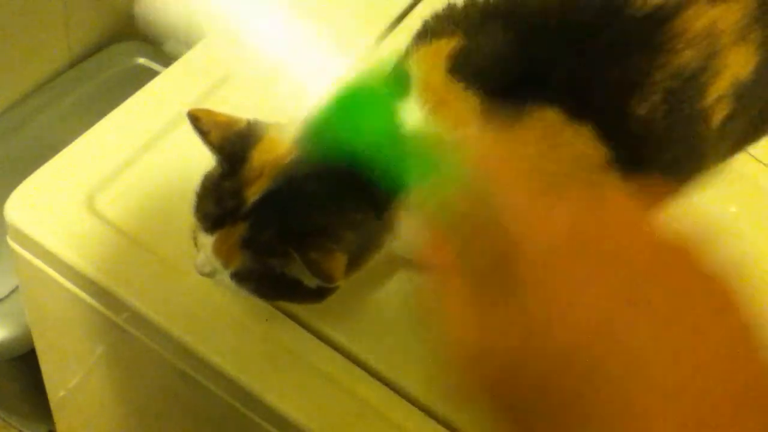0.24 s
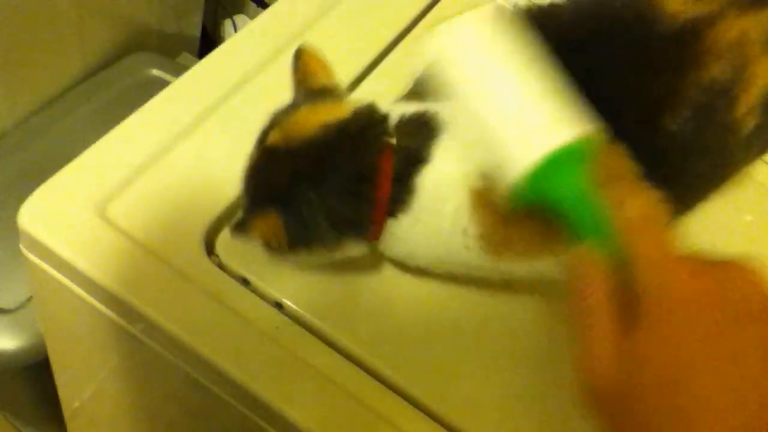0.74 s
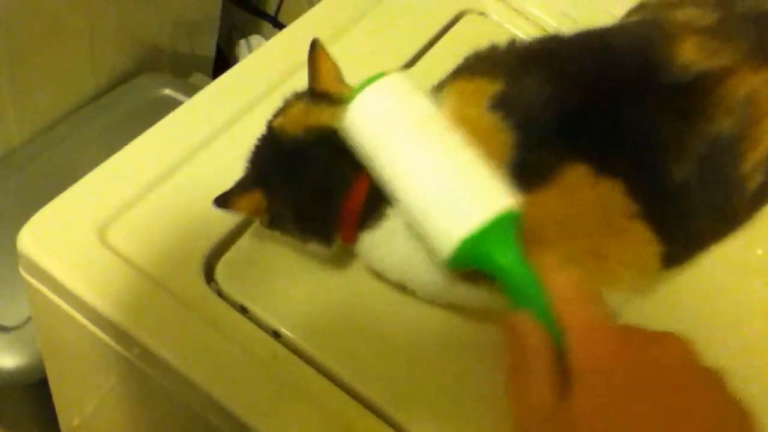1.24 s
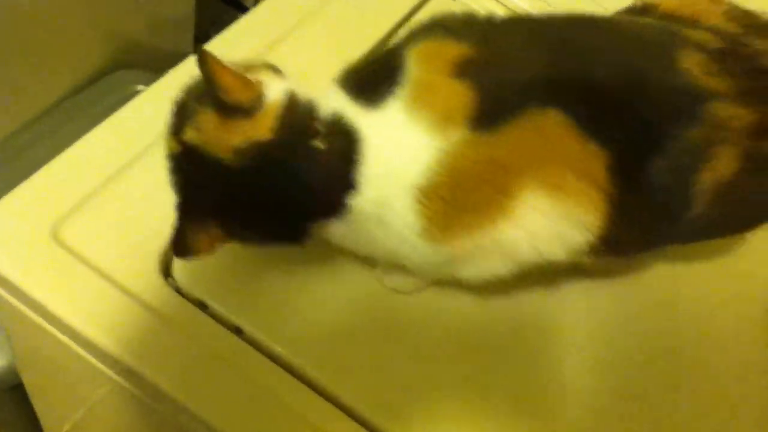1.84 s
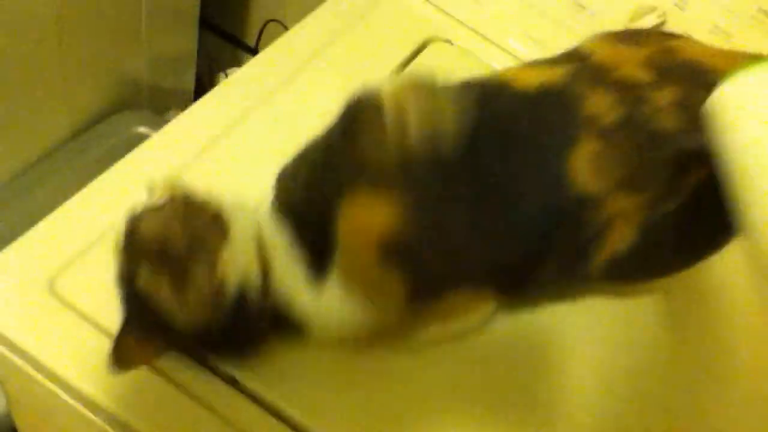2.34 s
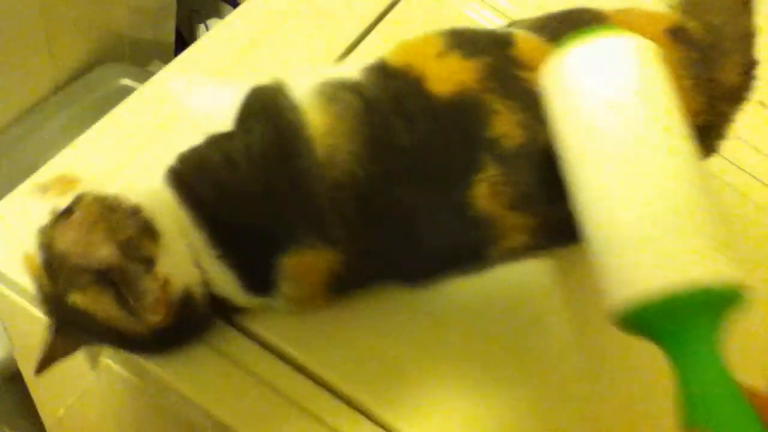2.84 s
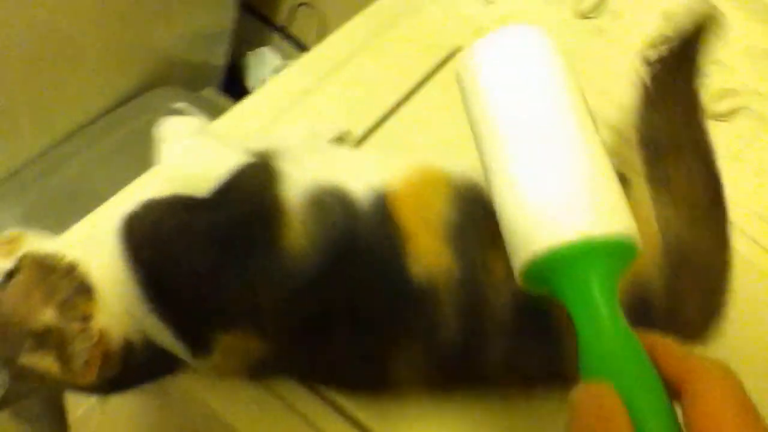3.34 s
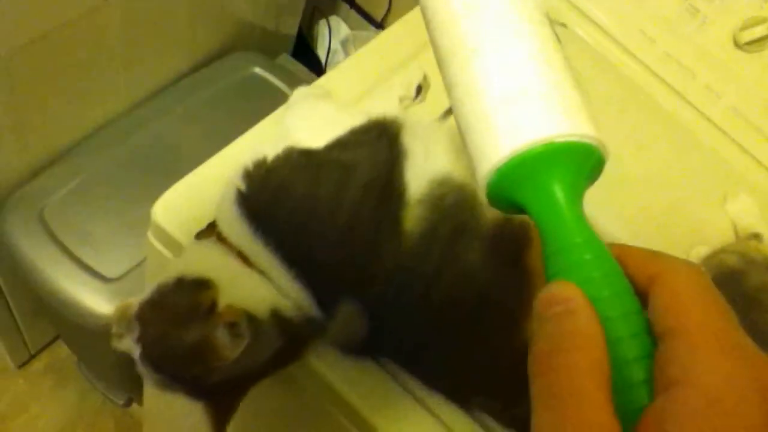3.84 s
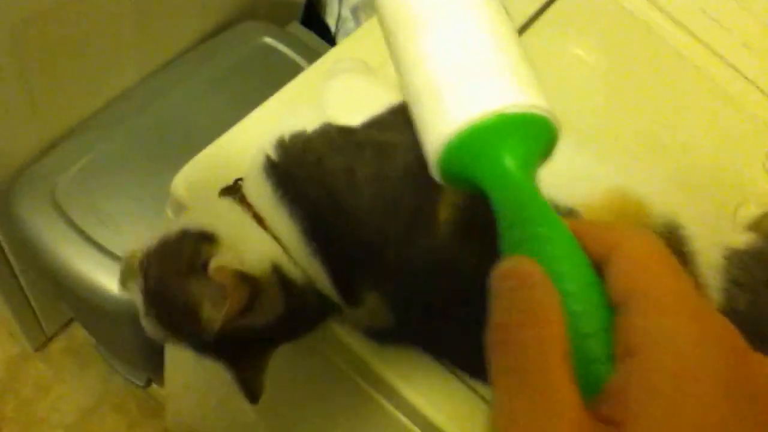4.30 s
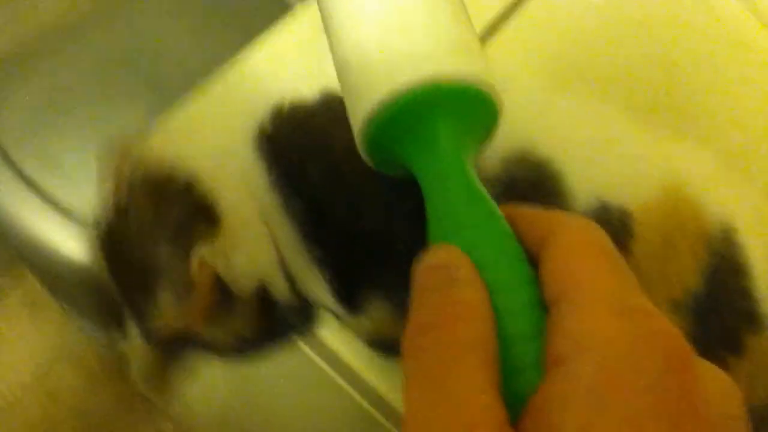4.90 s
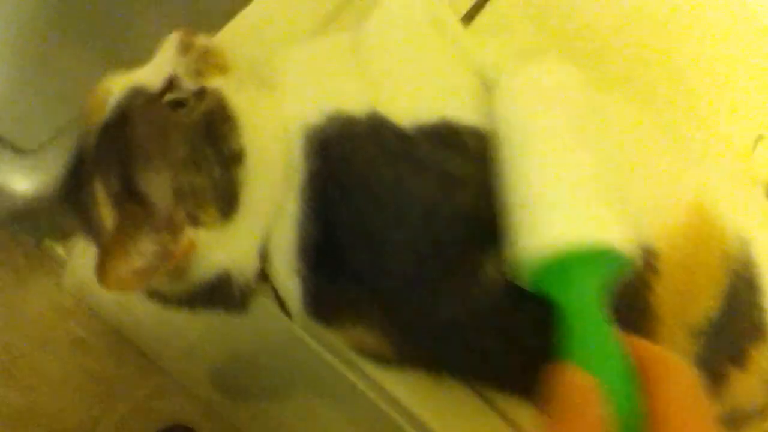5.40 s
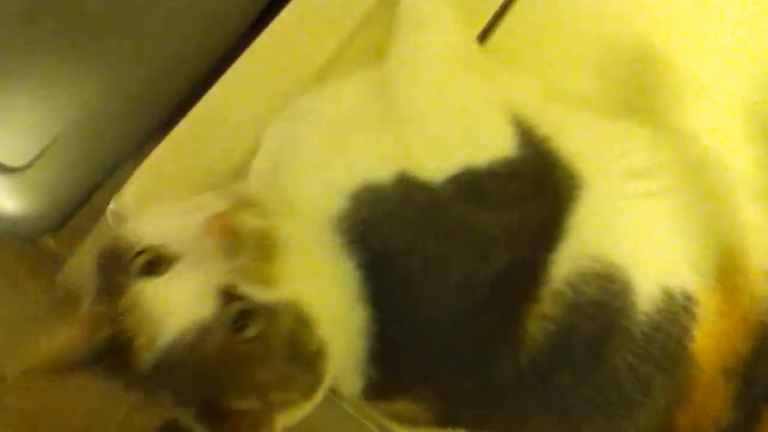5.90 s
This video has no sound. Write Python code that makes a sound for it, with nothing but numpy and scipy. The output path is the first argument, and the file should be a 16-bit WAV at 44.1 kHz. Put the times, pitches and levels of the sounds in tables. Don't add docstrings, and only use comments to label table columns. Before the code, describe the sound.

Close to the microphone, glue rips lightly from hair in short bright strokes, with hollow plastic knocks between them. A cat purrs in soft fluttering breaths. After the strokes stop, it shifts its weight on a metal appliance top, giving dull rumbles, a tag chink and dry scuffs. A calmer stretch of purr and small clacks leads to a last burst of sticky crackle, over low motor hum and faint ticking.

```python
import sys
import numpy as np
from scipy import signal
from scipy.fft import rfft, irfft, next_fast_len
from scipy.io import wavfile
from scipy.ndimage import map_coordinates

SR = 44100
rng = np.random.default_rng(int(sys.argv[2]) if len(sys.argv) > 2 else 0)


def to_wav(sig):
    pcm = np.clip(np.atleast_2d(sig), -1, 1) * 32767
    pcm = np.round(pcm).astype(np.int16)
    wavfile.write(sys.argv[1], SR, pcm.T)


def to_linear_factor(level_db):
    exponent = np.asarray(level_db, float) / 20
    return 10 ** exponent


N = 271215

# start t/s, crest t/s, end t/s, level/dB
BREATHS = [
    (.88, 1.01, 1.38, -52),
    (2.2, 2.26, 2.6, -52),
    (2.56, 2.77, 2.9, -50),
    (3.72, 3.95, 4.31, -52),
    (5.31, 5.345, 5.62, -50.5),
    (5.65, 5.71, 5.98, -55),
]
# first snap t/s, rate f/Hz, slide of phase [cycles/s2]
SNAP_RUNS = [
    (.892, 28.4, 0),
    (2.215, 29.3, -3),
    (2.607, 28.3, 0),
    (3.722, 29.2, -.5),
    (5.294, 28.55, 0),
]
# f/Hz, width f/Hz, level/dB
THROAT = [
    (129, 28, 6),
    (182, 112, 11),
    (306, 90, -11),
]


def purr():
    t = np.arange(N) / SR
    run = np.maximum(np.searchsorted(np.array(SNAP_RUNS)[:, 0], t) - 1, 0)
    first, rate, slide = np.transpose(SNAP_RUNS)[:, run]
    since = t - first
    turns = rate * since + slide * since ** 2 / 2 + 0.037 * wobble(25)
    snaps = (np.diff(np.floor(turns), prepend=0) > 0) * to_linear_factor(1.0 * wobble(40))
    puffs = rng.standard_normal(N) * np.exp(-3.5 * (turns % 1))

    def chest(f):
        high_pass = (1j * f / (95 + 1j * f)) ** 2
        low_pass = 1 / (1 + 1j * f / 520) ** 2
        return modes(THROAT)(f) * high_pass * low_pass

    voice = unit(filtered(snaps, chest)) + 0.45 * unit(filtered(puffs, chest))
    return swells(BREATHS, sharp=0.57) * unit(voice)


# start t/s, crest t/s, end t/s, peel level/dB, core level/dB
STROKES = [(0.03, 0.106, 0.19, -44.5, -52), (0.163, 0.2, 0.32, -44, -54), (0.702, 0.782, 0.86, -52.5, -46),
           (.83, 0.978, 1.146, -45, -52), (1.32, 1.348, 1.39, -72, -56), (1.458, 1.575, 2.17, -43.5, -51.5),
           (1.884, 2.008, 2.125, -44, -52), (1.975, 2.022, 2.026, -39, -52), (2.34, 2.403, 2.47, -61, -66),
           (2.637, 2.753, 2.87, -59, -62.5), (5.52, 5.715, 5.85, -53.5, -53),
           (5.723, 5.9, 6.01, -45.5, -52.5), (5.772, 5.858, 5.96, -44, -56)]
# t/s, firmness [0-1]
FIRMNESS = [(.15, 0), (.2, .45), (.8, .25), (1, .4), (1.5, .5), (1.6, 1), (2.1, 1), (5.7, 1)]
# f/Hz, density level/dB per Hz
PEEL = [(1500, -36), (2300, -15), (3100, -3.5), (4200, -1), (5300, -1.5), (7000, -2.5), (9000, -11.5),
        (12000, -54)]
# f/Hz, width f/Hz, level/dB
PAPER_ROLL = [
    [(2000, 150, -4), (2500, 300, 0), (3360, 250, -5), (4500, 200, -8)],
    [(1670, 120, -6), (2160, 100, -7), (3130, 200, 0), (5280, 300, -4)],
]
# f/Hz, density level/dB per Hz
CORE = [(450, -35), (750, -9), (1040, -6), (1110, 3), (1190, -7), (1900, -5), (2500, -4), (3300, -9),
        (4800, -30)]
# f/Hz, density level/dB per Hz
FIZZ = [(6000, -120), (7500, -6.5), (10000, 2), (12500, -3.5), (15500, -18)]


def roller():
    snaps = crackle(spread_db=2, clump_db=0.7)
    firm = np.clip(np.interp(np.arange(N) / SR, *np.transpose(FIRMNESS)), 0, 1)
    light, hard = (unit(filtered(crackle(spread_db=2, clump_db=3.5), modes(table))) for table in PAPER_ROLL)
    paper = np.sqrt(1 - firm) * light + np.sqrt(firm) * hard
    peel = unit(coloured(snaps, PEEL)) + 0.73 * paper
    core = unit(coloured(snaps, CORE))
    fizz = to_linear_factor(-12 + 3.5 * firm) * unit(coloured(snaps, FIZZ))
    pull = swells([(*row[:3], row[3]) for row in STROKES], sharp=1.27)
    roll = swells([(*row[:3], row[4]) for row in STROKES], sharp=1.27)
    near = pull * (unit(peel) + fizz) + roll * core
    return 0.94 * near + 0.31 * signal.fftconvolve(near, tail())[:N]


# t/s, peak level/dB, low-band level/dB, high-
# band level/dB, decay share [0-1]
CLACKS = [(0.578, -20.5, -23, -30, 0.74), (1.14, -12, -24, -20.5, .95), (1.334, -44, -10, -14, .56),
          (2.503, -10, -21, -13, 1), (2.965, -23.5, -24.5, -32.5, 0.67), (3.257, -20.5, -16.5, -21.5, 0.86),
          (3.382, -28.5, -12, -45, 0.66), (3.49, -37.5, 7, -28, 1), (4.156, -27.5, -18, -39, 0.76),
          (4.25, -28, -18, -24, 0.65), (5.431, -30.5, -14, -34, .64), (5.597, -28, -13, -26, 0.55)]
# f/Hz, density level/dB per Hz
CLACK_COLOUR = [(150, -34), (300, -21.5), (450, -10.5), (1000, -6.5), (2000, -4), (3300, -3.5), (5200, 0),
                (8000, -5), (11500, -4.5), (15800, -15), (17000, -64)]


def clacks():
    out = np.zeros(N + SR)
    t = np.arange(SR // 2) / SR
    hz = np.fft.rfftfreq(2048, 1 / SR)
    for s, db, low_db, high_db, share in CLACKS:
        tilt = [(1100, low_db + 18.5), (2200, 0), (4200, 0.0099),
                (9000, high_db + 18.0), (14000, 1.4 * (high_db + 9.5))]
        colour = causal(along(CLACK_COLOUR, hz) + along(tilt, hz))
        scatter = np.minimum(4 * rng.exponential(size=len(t)), 10) - 6
        echoes = to_linear_factor(scatter * np.exp(-t / 0.02))
        damping = to_linear_factor(-60 * t / 2.0 * (1 / max(share, 0.2) - 1))
        answer = tail()[:len(t)] * echoes * damping * np.minimum(t / 0.0016, 1)
        answer += to_linear_factor(-3.5) * lid_ring(t, scatter_db=3, t60=0.33 * share)
        answer[0] = to_linear_factor(-13)
        hit = signal.fftconvolve(answer, colour)[:len(t)]
        out[round(s * SR):][:len(t)] += to_linear_factor(db - 10) * hit / np.sqrt(np.mean(hit[:700] ** 2))
    return out[:N]


# t/s, level/dB
TAG_BLOWS = [
    (2.503, -29),
    (4.24, -51),
]
# f/Hz, level/dB, t60 t/s
TAG_MODES = [(1125, -13, .4), (2153, -9, .35), (2525, 0, .34), (2490, -9, .25), (3042, -5, .22),
             (3250, -7, .24), (4484, -9, .25), (5130, -9, .19), (10170, -3, .08), (10195, -10, .2),
             (14800, -3, .12), (14818, -5, .12)]


def tag():
    out = np.zeros(N + SR)
    t = np.arange(SR // 2) / SR
    for s, db in TAG_BLOWS:
        ring = sum(to_linear_factor(level - 60 * t / t60) * np.sin(2 * np.pi * hz * t + rng.uniform(0, 2 * np.pi))
                   for hz, level, t60 in TAG_MODES)
        clatter = filtered(rng.standard_normal(len(t)), modes([(9400, 9000, 0)]))
        clatter = clatter * to_linear_factor(-34 - 60 * t / 0.11)
        out[round(s * SR):][:len(t)] += to_linear_factor(db) * (ring + clatter) * (1 - np.exp(-t / 0.0012))
    return out[:N]


# start t/s, crest t/s, end t/s,
# level/dB
DRAGS = [(.74, .8, .87, -55), (3.376, 3.392, 3.47, -42), (3.46, 3.5, 3.61, -50), (5.45, 5.5, 5.6, -56),
         (5.6, 5.64, 5.75, -52), (3.3, 3.35, 3.39, -43.5), (5.085, 5.13, 5.2, -48),
         (5.11, 5.22, 5.35, -42.5)]
# t/s, level/dB
JOLTS = [(3.43, -43), (5.165, -40), (5.202, -39), (5.22, -42), (5.247, -44), (5.261, -40), (5.503, -50),
         (5.547, -50), (5.575, -52)]
# f/Hz, density level/dB per Hz
FUR_ON_STEEL = [(350, -40), (520, -13), (700, -4), (850, 0), (1230, 0), (1600, -5), (2260, -9), (3500, -14),
                (6000, -21), (10000, -45)]
# t/s, level/dB, settling time t/s
SHIFTS = [(0, -42, 0.13), (.26, -50, .5), (1.54, -61, 0.39), (2.23, -48, 0.14), (2.52, -41.5, 0.24),
          (2.74, -40.5, 0.17), (3.08, -43.5, .45), (3.55, -47, 0.094), (3.77, -45, 0.089),
          (4.11, -44.5, .9), (5.29, -47, .9)]
# t/s, level/dB
THUDS = [
    (2.483, -33),
    (2.53, -36),
    (4.25, -41),
]


def coat():
    jolts = [(s - 0.009, s, s + 0.014, db) for s, db in JOLTS]
    friction = unit(coloured(crackle(spread_db=3, clump_db=1.2), FUR_ON_STEEL))
    judder = swells(DRAGS + jolts, sharp=2) * friction
    ring = lid_ring(np.arange(SR // 4) / SR, scatter_db=8, t60=0.13)
    rung = signal.fftconvolve(judder, ring)[:N]
    leans = [(s - 0.19, s, s + settles, db) for s, db, settles in SHIFTS]
    thuds = [(s - 0.019, s, s + 0.019, db) for s, db in THUDS]
    flex = unit(filtered(rng.standard_normal(N), modes([(73, 38, 0), (114.5, 58, 0)])))
    rumble = to_linear_factor(-8) * swells(leans + thuds, sharp=2.1) * flex
    return 0.56 * judder + 0.22 * rung + rumble


LID_HZ = [385, 440, 510, 545, 690, 800, 860, 980, 1110, 1240, 1350, 1560, 1700, 1920, 2150, 2340, 2520,
          2790, 2870, 3040, 3250, 3360, 3680, 3840, 4290, 4420, 5170, 5740]


def lid_ring(t, scatter_db, t60):
    hz = np.array(LID_HZ)[:, None]
    chance = rng.standard_normal((len(hz), 2))
    level = scatter_db * chance[:, :1] - 60 * t / t60 * (hz / 1000) ** 0.28
    ring = to_linear_factor(level) * np.sin(2 * np.pi * hz * (1 + 0.004 * chance[:, 1:]) * t)
    return unit(ring.sum(axis=0)) / np.sqrt(len(t))


# first t/s, period t/s
TICK_RUNS = [
    (.0707, .0831),
    (.8694, .06678),
    (2.6883, .08334),
    (3.9218, .06672),
    (5.0065, .08328),
]
# t/s, peak level/dB, f/Hz, rise t/s
PIPS = [
    (2.4595, -34, 1300, .0003),
    (1.342, -53, 5250, .005),
    (5.497, -50, 5250, .0025),
]


def ticks():
    out = np.zeros(N + SR)
    t = np.arange(3000) / SR
    ends = [first for first, _ in TICK_RUNS[1:]] + [N / SR]
    times = np.concatenate([np.arange(first, end - period / 2, period)
                            for (first, period), end in zip(TICK_RUNS, ends)])
    chance = rng.standard_normal((len(times), 2))
    bursts = [(s - 0.001, -51 + 2.5 * a, 7480 * (1 + 0.01 * b), 0.001) for s, (a, b) in zip(times, chance)]
    for s, db, hz, rise in bursts + PIPS:
        burst = np.sin(2 * np.pi * hz * t) * t / rise * np.exp(1 - t / rise)
        out[round(s * SR):][:len(t)] += to_linear_factor(db) * burst
    return out[:N]


# f/Hz, rms level/dB at start, rms level/dB at end
HUM = [(27.5, -58.5, -54), (59.1, -57, -55.5), (58.6, -58, -63.5), (92, -62.5, -66), (182, -100, -58.5),
       (235, -62, -63), (240.5, -85, -74.5)]
# f/Hz, density level/dB per Hz
AIR = [(11, -52), (18, -6), (65, -13.5), (150, -10), (260, -13), (400, -16.5), (620, -19.5), (1130, -23.5),
       (2400, -27), (4500, -28.5), (7500, -27.5), (11000, -31), (15000, -36.5), (16500, -31)]


def room_tone():
    t = np.arange(N) / SR
    lines = np.zeros(N)
    for (hz, db, end_db), phase in zip(HUM, rng.uniform(0, 2 * np.pi, len(HUM))):
        level = to_linear_factor(db + 4 + (end_db - db) * t / t[-1])
        sway = to_linear_factor(3 * np.tanh(wobble(11)))
        lines += level * sway * np.sin(2 * np.pi * hz * t + 0.8 * wobble(7) + phase)
    swell = to_linear_factor(0.4 * wobble(2.5))
    air = unit(coloured(rng.standard_normal(N), AIR))
    return lines + to_linear_factor(-52) * swell * air


# f/Hz, t60 t/s
ROOM = [(300, 0.62), (1000, 0.4), (2500, 0.27), (5000, 0.2), (12000, 0.13)]


def tail():
    hz, t, z = signal.stft(rng.standard_normal(SR // 2), SR, nperseg=256)
    decay = to_linear_factor(-60 * t / along(ROOM, hz)[:, None])
    answer = signal.istft(z * decay, SR, nperseg=256)[1]
    return answer / np.linalg.norm(answer)


def crackle(spread_db, clump_db):
    return rng.standard_normal(N) * to_linear_factor(spread_db * rng.exponential(size=N) + clump_db * wobble(45))


def swells(rows, sharp):
    t = np.arange(0, N / SR + 0.002, 0.001)
    power = np.zeros(len(t))
    for start, crest, end, db in rows:
        angle = np.interp(t, [start, crest, end], [0, np.pi / 2, np.pi])
        power += (to_linear_factor(db) * np.sin(angle) ** sharp) ** 2
    return np.interp(np.arange(N) / SR, t, np.sqrt(power))


def wobble(rate):
    return map_coordinates(rng.standard_normal(2000), [np.arange(N) * rate / SR])


def modes(table):
    def response(f):
        return sum((-1) ** k * to_linear_factor(db) * 1j * f * width / (hz * hz - f * f + 1j * f * width)
                   for k, (hz, width, db) in enumerate(table))
    return response


def filtered(x, response):
    m = next_fast_len(len(x) + 8192)
    return irfft(rfft(x, m) * response(np.fft.rfftfreq(m, 1 / SR)), m)[:len(x)]


def coloured(x, points):
    return filtered(x, lambda f: to_linear_factor(along(points, f)))


def causal(gain_db):
    c = irfft(np.log(to_linear_factor(np.maximum(gain_db, -100))))
    half = len(c) // 2
    folded = np.r_[c[0], 2 * c[1:half], np.zeros(half)]
    return irfft(np.exp(rfft(folded)))[:half]


def along(points, hz):
    f, v = np.transpose(points)
    return np.interp(np.log(hz + 1), np.log(f + 1), v)


def unit(x):
    return x / np.sqrt(np.mean(x ** 2) + 1e-20)


def scene():
    return (purr() + roller() + coat() + clacks() + tag() + ticks() + room_tone())[None]


def top_cut(x):
    return signal.sosfilt(signal.butter(12, 15850, fs=SR, output="sos"), x)


def record(dry):
    return top_cut(dry)


dry = scene()
out = record(dry)
to_wav(out)
```